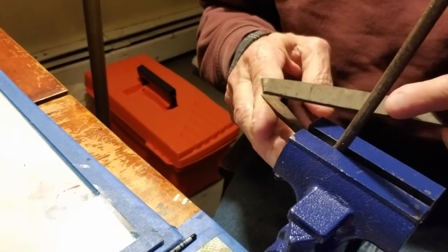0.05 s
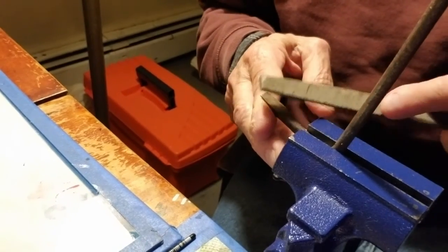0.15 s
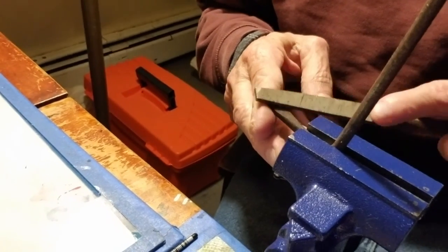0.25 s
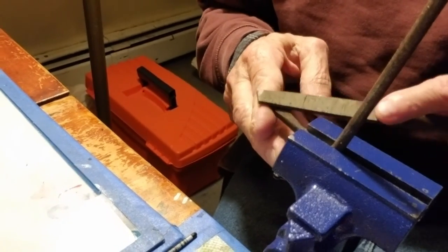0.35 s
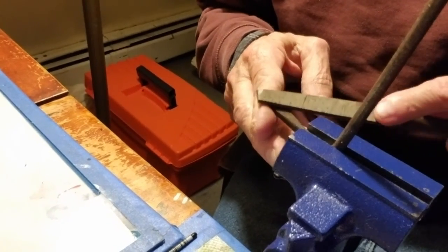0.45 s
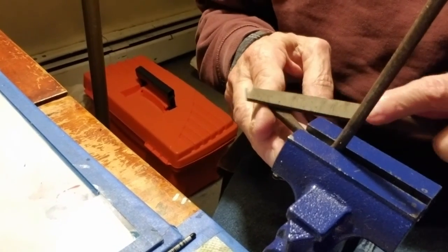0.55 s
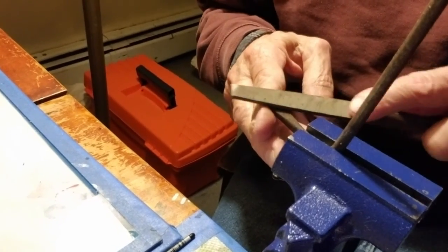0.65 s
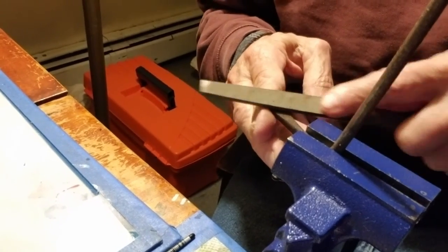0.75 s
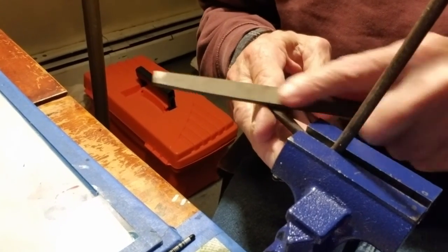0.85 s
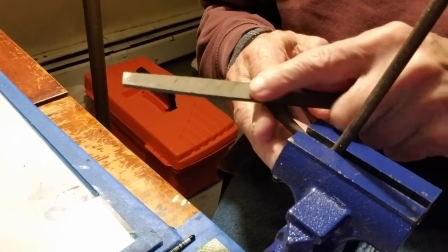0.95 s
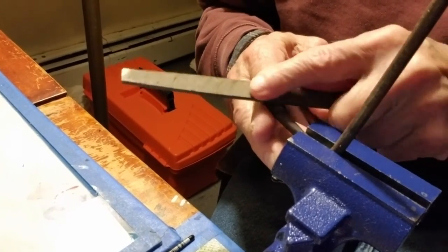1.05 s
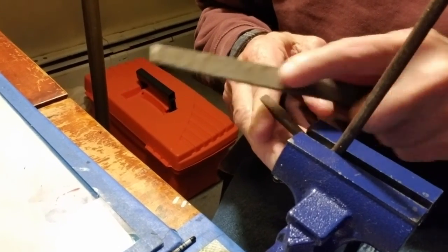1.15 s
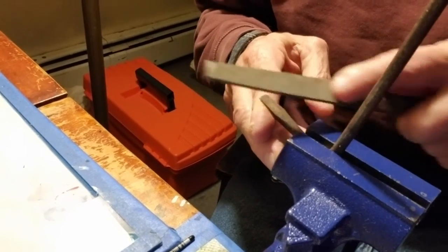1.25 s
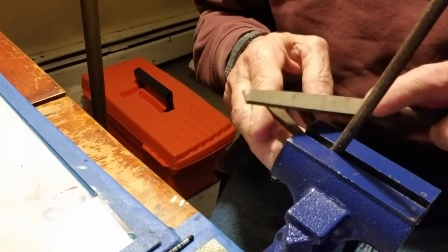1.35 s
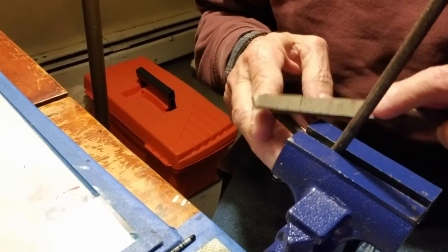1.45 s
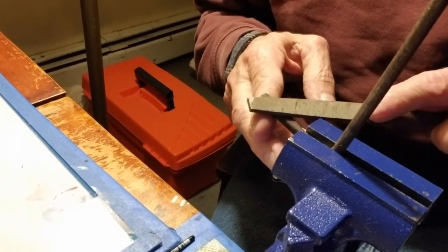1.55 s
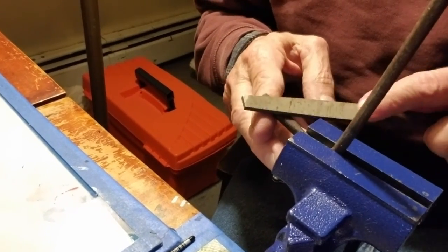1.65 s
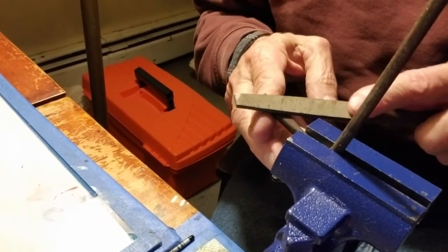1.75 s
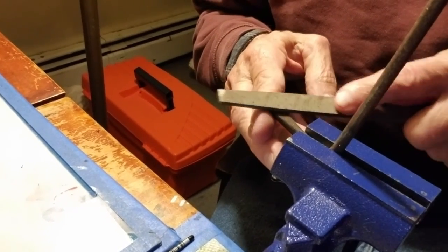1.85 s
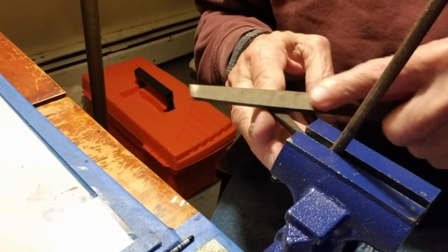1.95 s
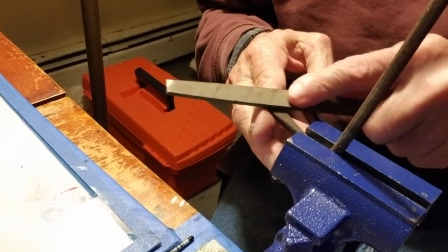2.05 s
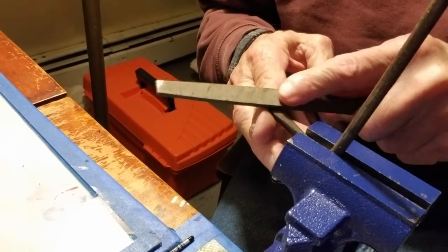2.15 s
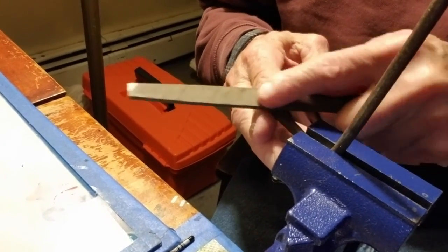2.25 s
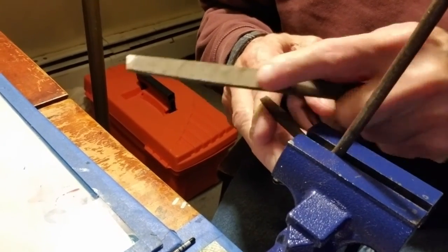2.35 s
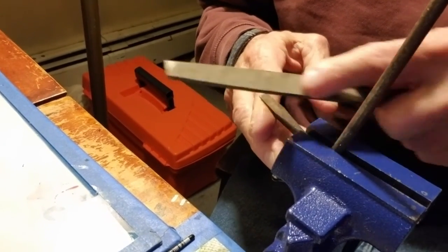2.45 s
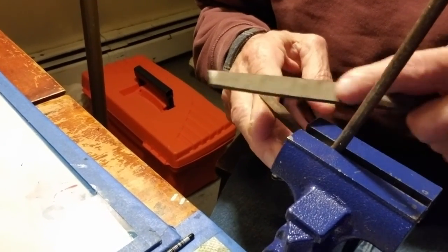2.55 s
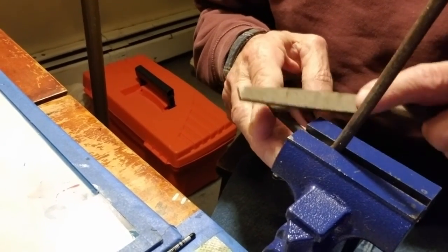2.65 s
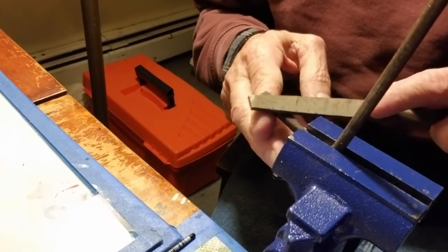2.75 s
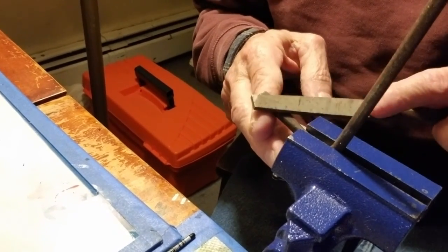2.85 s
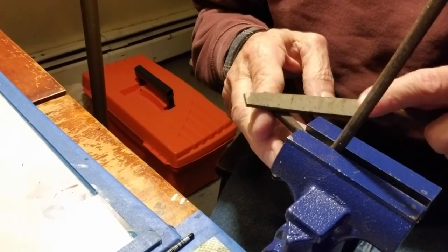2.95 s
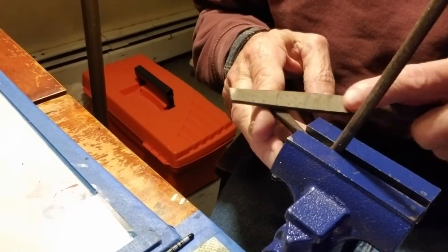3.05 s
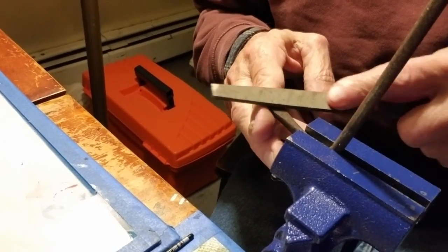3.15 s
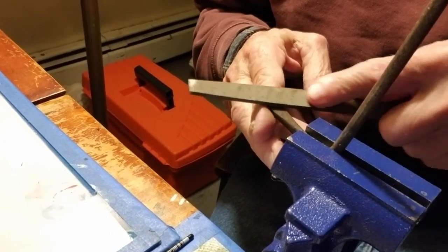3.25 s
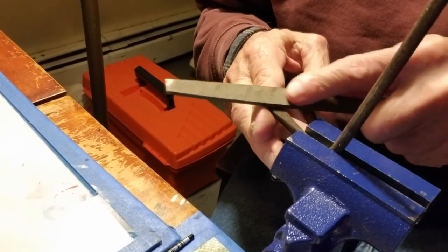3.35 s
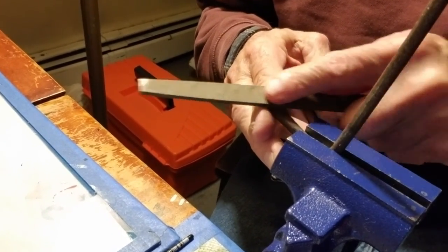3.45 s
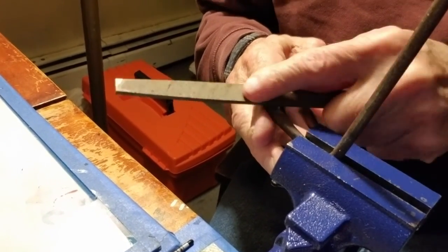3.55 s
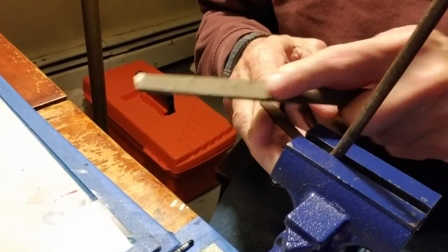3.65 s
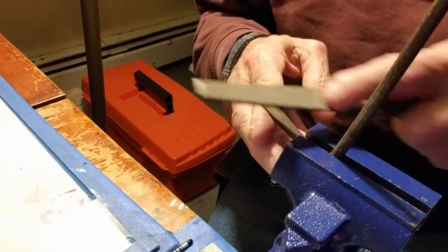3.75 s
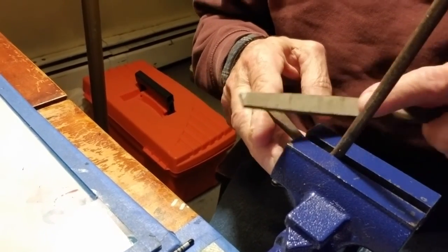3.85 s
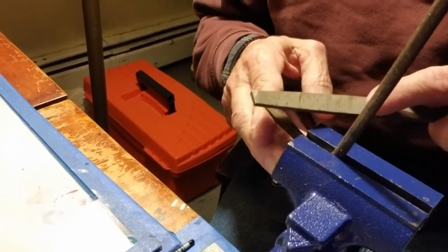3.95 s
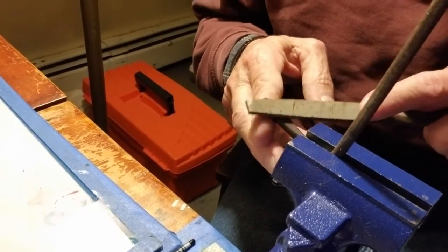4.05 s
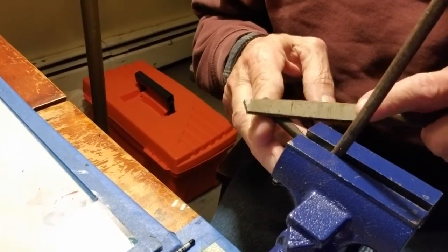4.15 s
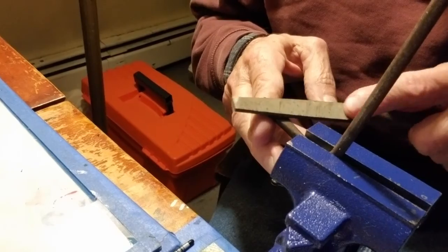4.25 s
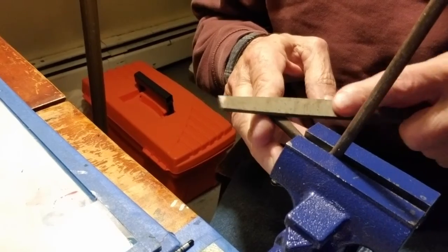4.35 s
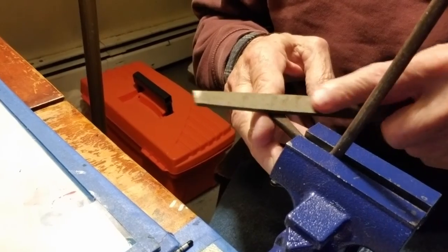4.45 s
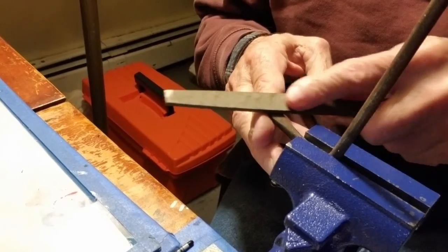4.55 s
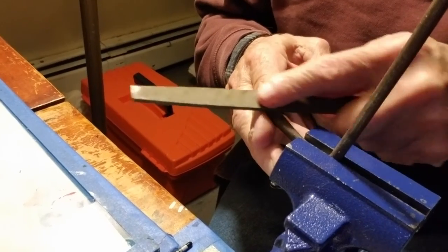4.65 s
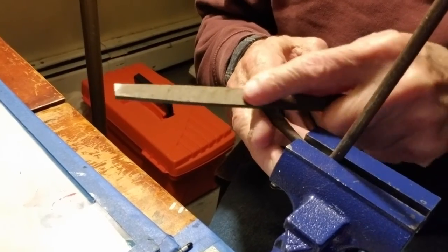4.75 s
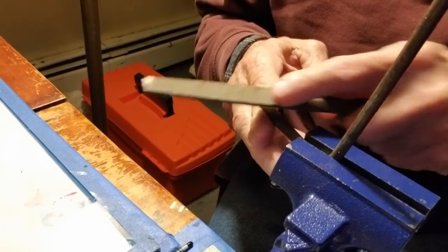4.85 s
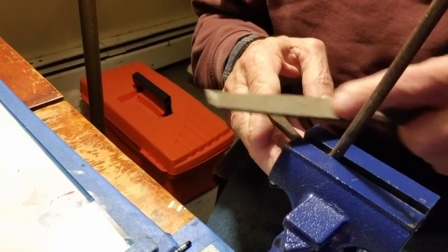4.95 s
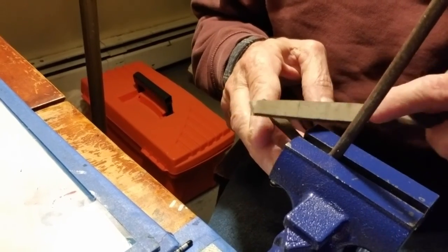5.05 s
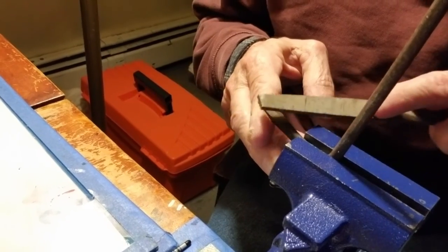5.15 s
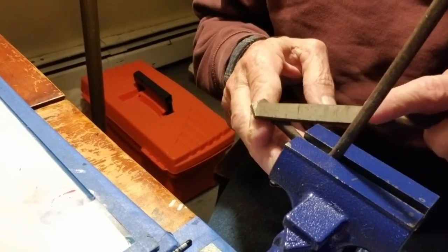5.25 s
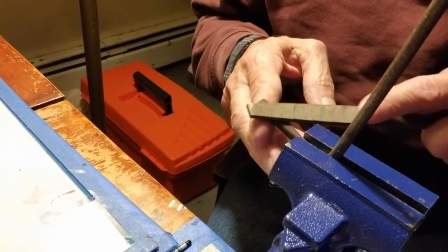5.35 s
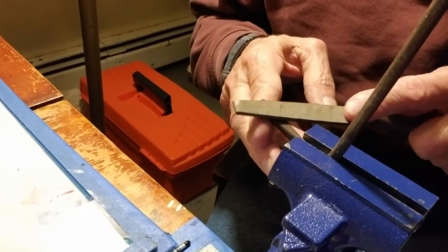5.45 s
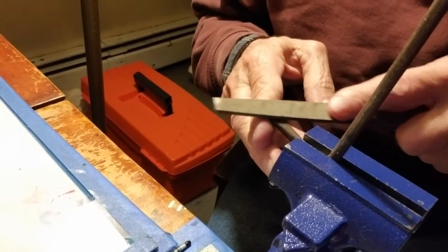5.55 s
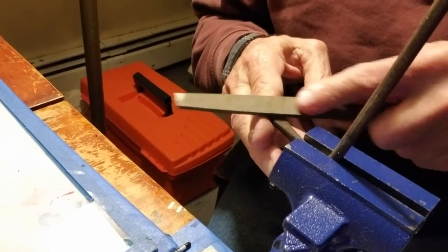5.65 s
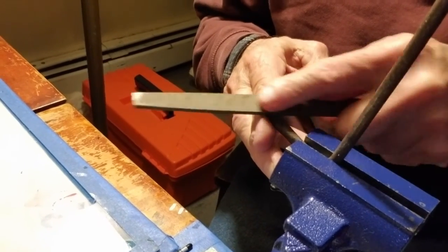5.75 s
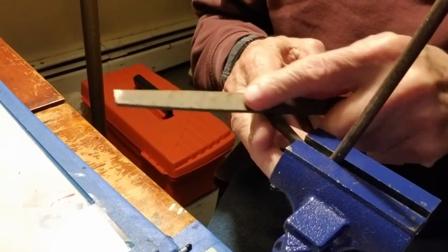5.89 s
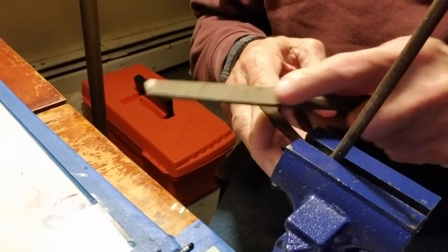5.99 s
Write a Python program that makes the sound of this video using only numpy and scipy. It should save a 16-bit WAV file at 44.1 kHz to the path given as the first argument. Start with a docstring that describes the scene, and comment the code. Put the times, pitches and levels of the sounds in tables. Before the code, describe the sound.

Hand filing of clamped steel, picked up nearby by a phone in stereo with short room reflections. A bright metallic tap opens, then five uneven rasping strokes follow at roughly one-second intervals, dry and scratchy on top with a woody, droning bench underneath. Between them the file rattles against the tip, the vise knocks dully and hands shift softly. A brief faint hum comes before the fourth stroke; low room tone and slight hiss remain throughout.

```python
"""Over a quiet workshop, a hand file is first set down on a steel screwdriver tip held in a vise, and taps.
Five pushing strokes follow: unevenly caught teeth make the bench drone, the shank ring short and the cut hiss.
Around them, touches rattle the file's modes, snags jolt the vise and shifting hands stir the bench.
A soft hum swells between the third and fourth strokes; a last touch follows the fifth.
A phone with two microphone ports stands close by: modes are filtered random catches or decaying sines."""
import sys
import numpy as np
from scipy import signal
from scipy.fft import rfft, irfft, next_fast_len
from scipy.io import wavfile
from scipy.ndimage import uniform_filter1d

SR = 44100
rng = np.random.default_rng(int(sys.argv[2]) if len(sys.argv) > 2 else 0)


def to_wav(sig):
    """Store sig (one row per channel, or 1-D mono) as 16-bit WAV at the path in sys.argv[1].

    Samples outside -1..1 are clipped; the rate is SR.
    """
    pcm = np.clip(np.atleast_2d(sig), -1, 1) * 32767
    pcm = np.round(pcm).astype(np.int16)
    wavfile.write(sys.argv[1], SR, pcm.T)  # frames by channels


N = 265482
T = np.arange(N) / SR
FFT_SIZE = next_fast_len(N + SR)
HZ = np.arange(FFT_SIZE // 2 + 1) * SR / FFT_SIZE

# Spectrum of the quiet workshop. Each row: frequency in Hz, relative density in dB per Hz.
QUIET_SPECTRUM = [(24, -58), (40, -23), (144, -1.5), (469, -20.5), (603, -26.5), (684, -21), (756, -29.5),
                  (1220, -24), (1530, -32.5), (2340, -29), (3970, -35), (5780, -31.5), (8020, -40),
                  (13600, -23.5), (16200, -26.5)]
QUIET_DB = -71  # RMS of the mean of both ports
# Balance of the microphone ports. Each row: frequency in Hz, left minus right in dB.
PORT_BALANCE = [(60, 1.5), (110, 0), (200, -0.5), (380, 1), (700, -3.0), (1290, -3.5), (2380, -4),
                (4400, -5), (8120, -8), (15000, 2.5)]
LEFT_LAG_S = -.0001  # negative: the left port hears the direct sound first
TOP_HZ = 15900

# Decay times by 60 dB, and levels of the reflections
BENCHTOP_T60_S, BENCHTOP_DB = .025, .5
ROOM_T60_S, ROOM_TREBLE_T60_S, ROOM_DB = 0.28, 0.15, -0.5

# The soft hum; it rises and fades by 20 dB in the given times
HUM_FROM_S, HUM_TO_S, HUM_HZ, HUM_DB = 3.875, 3.96, 236, -52.5
HUM_RISE_S, HUM_FADE_S = 0.045, 0.057

# Modes of bench and vise. Each row: frequency in Hz, width in Hz, relative level in dB.
BENCH_MODES = [(51, 37, -18.5), (69.4, 23.3, -3), (92.1, 6.7, -4), (134.2, 19, 4.5), (182.7, 16, 1.5),
               (222.5, 43, -9), (276.5, 20.9, -1), (362, 14.5, -5.5), (438.6, 25, -4.5), (548.6, 66, -17.5)]
# Modes of the screwdriver shank. Each row: frequency in Hz, width in Hz, relative level in dB.
SHANK_MODES = [(686.4, 38, -1.5), (769.6, 23, 0.5), (930, 97, -2), (1074, 90, -9), (1303, 60, -2),
               (1432, 41, -10.5), (1607, 69, -2), (1695, 62, 1), (1974, 58, -7.5), (2267, 74, -16.5),
               (2516, 90, -16.5), (2890, 110, -16)]
# File modes damped by both hands. Each row: frequency in Hz, relative level in dB, 60 dB decay time in s.
FILE_MODES = [(1460, -3.5, 0.03), (1670, -4.5, 0.027), (2188, -1.5, 0.025), (2468, -4, .025),
              (2735, -5.5, 0.027), (2834, -5, 0.064), (4150, -5.5, 0.027), (4927, 3.5, 0.025),
              (5800, -8.5, 0.021), (6520, 2, 0.018), (8400, -14, 0.016), (8915, -8.5, 0.04),
              (10380, -20.5, .018), (11250, -3, .018), (12350, -5, .015), (13090, -17, .018),
              (14400, -6, 0.019), (14600, -5, .015)]

# Hands shift on the bench. Each row: time in seconds, 20 dB fading time in s, level in dB.
# Rows with a negative fading time add nothing audible.
BUMPS = [(.01, 0.3, -61), (0.119, 0.1, -65), (.155, -0.03, -59), (.29, -0.06, -54), (.41, 0.2, -56),
         (1.27, 0.02, -55), (1.37, 1.1, -70), (1.49, -0.6, -70), (1.625, 0.12, -42), (2.58, -0.08, -69),
         (2.79, 0.1, -58.5), (3.76, 0.18, -60.5), (4.0, 0.05, -61), (4.93, 0.3, -58.5), (5.03, -0.08, -54)]
# The file snags and jolts the vise. Each row: start in seconds, level in dB, pitch in Hz,
# knock relative to the tone in dB.
JOLTS = [(0.521, -42, 286, -16), (0.965, -17.5, 129, -15.5), (1.209, -36, 111, 1.5),
         (2.088, -26.5, 195, -11.5), (2.147, -22, 399.5, 4.5), (3.405, -31, 137, -19.5),
         (3.969, -52, 143, -7.5), (4.345, -29.5, 134, -20.5), (5.84, -29, 184, -12.5)]
# The file touches the tip. Each row: start in seconds, level in dB, brightness in dB per octave,
# shank level in dB, grit level in dB, the last two relative to the touch.
TAPS = [(0.2508, -19.5, 0.5, -4.5, 0.5), (0.3831, -59, 6.5, 11, -13), (1.1929, -46, -9, 13, -16),
        (1.533, -49, -15, 13.5, 4), (1.5941, -22, 0, 4.5, 0), (1.7609, -56, 6, -4, 0),
        (2.421, -49, -1, -2, -9), (2.747, -28, -5.5, -7, -5), (4.1248, -44.5, -7.5, 4.5, -7.5),
        (4.2872, -59, 6, -3, 12), (5.2801, -36, -4, 0.5, -2), (5.3558, -40, -3, -21, -5),
        (5.9894, -36, -6, 5, -14)]
# The file settles after a tap: base levels, to which a share of the tap's dB is added
SETTLE_DB, SETTLE_UPPER_DB, SETTLE_SHANK_DB = -50.5, -42.5, -43.5
SETTLE_SHARE, SETTLE_FADE_S = 0.38, .1

# Pressure of the strokes. Each row: full pressure from in seconds, lift in seconds, bench drone in dB
# at first, midway and at lift, shank ring in dB at first and at lift.
STROKES = [(0.622, 1.028, -42.5, -42, -39, -49.5, -50), (1.727, 2.364, -42.5, -35.5, -41.5, -49.5, -50.5),
           (3.029, 3.562, -47.5, -42, -40.5, -55.5, -50), (4.298, 4.767, -38, -39, -40.5, -50, -51),
           (5.461, 5.864, -41, -39.5, -38, -54.5, -49)]
PRESS_DB_PER_S, LIFT_DB_PER_S, SHANK_LIFT_DB_PER_S = 267, 240, 450
UPPER_DB = -.5  # upper bench modes relative to lower, while filing
# Bite of the teeth, one list a stroke. Each row: time in seconds, hiss in dB before smoothing.
BITE = [
    [(.5, -81), (.616, -53.5), (.712, -57.5), (.775, -41.5), (.866, -38), (.895, -43), (1.0, -50.5),
     (1.075, -84)],
    [(1.66, -68), (1.74, -65.5), (1.97, -47), (2.084, -46), (2.134, -60), (2.155, -51), (2.235, -51),
     (2.3, -36), (2.335, -54.5), (2.4, -79)],
    [(2.92, -85), (2.96, -72), (3.12, -53), (3.398, -48.5), (3.436, -56), (3.524, -42.5), (3.57, -50.5),
     (3.6, -47.5), (3.63, -66), (3.72, -91.5)],
    [(4.2, -78.5), (4.304, -54), (4.398, -56), (4.434, -46), (4.554, -48), (4.622, -50), (4.705, -47),
     (4.756, -51), (4.82, -89.5)],
    [(5.38, -71), (5.42, -61), (5.49, -56.5), (5.544, -58.5), (5.62, -47), (5.725, -42.5), (5.85, -48),
     (5.89, -74.5)],
]
# The file brushes the tip outside the push. Each row: time in seconds, 20 dB fading time in s,
# hiss in dB, shank in dB, bench in dB. Rows with a negative fading time add nothing audible.
SCUFFS = [(.395, -0.13, -76, -66, -58), (0.536, 0.03, -84, -67, -45.5), (1.118, 0.0538, -47.5, -51, -46.5),
          (1.21, 0.06, -72.5, -50, -48.5), (2.44, 0.14, -62.5, -71, -74), (5.365, 0.07, -56, -74, -87),
          (5.984, 0.17, -53.5, -52, -51)]
RISE_SHARE = 0.54  # rising time of bumps and scuffs, as a share of the fading time
# Spectrum of the cut. Each row: frequency in Hz, relative density in dB per Hz.
CUT_SPECTRUM = [(1290, -26), (2200, 3), (2640, -13.5), (2940, -7.5), (4490, -8.5), (4880, -9), (6980, -11),
                (7770, -10), (8950, -18), (10400, -12), (14600, -5), (16000, -6.5)]
SHANK_FROM_HISS_DB = -4


def undb(db):
    """Amplitude ratio of a level in decibels."""
    return 10 ** (np.asarray(db) / 20)


def unit(x):
    """Normalisation to an RMS of 1."""
    return x / np.sqrt(np.mean(x ** 2))


def shape(x, gain):
    """Linear filtering: multiply the spectrum by a complex gain."""
    return irfft(rfft(x, FFT_SIZE) * gain, FFT_SIZE)[..., :N]


def colour(points):
    """Spectral envelope in dB, interpolated over log frequency."""
    hz, db = np.transpose(points)
    return np.interp(np.log(HZ + 1), np.log(hz), db)


def resonance(hz, width):
    """Damped resonator: the band-pass of one mode, gain 1 at its centre."""
    s = 1j * HZ * width
    return s / (hz ** 2 - HZ ** 2 + s)


def body(modes):
    """Modal superposition with alternating sign, as neighbouring bending modes radiate."""
    total = 0
    for k, (hz, width, db) in enumerate(modes):
        total = total + (-1) ** k * undb(db) * resonance(hz, width)
    return total


def walk(rate):
    """Slow random fluctuation with an RMS of 1: noise held at the rate, then smoothed twice."""
    k = int(SR / rate)
    steps = np.repeat(rng.standard_normal(N // k + 1), k)
    return unit(uniform_filter1d(uniform_filter1d(steps, k), k)[:N])


def catches(rate, scatter_db):
    """Random impulse train: teeth catch at random moments, most lightly, a few hard."""
    chance = rng.random((N, 2)).T
    caught = chance[0] < rate / SR
    force = undb(-scatter_db * np.log(1 - chance[1]))
    return caught * rng.choice([-1, 1], N) * force


def rung(modes, rate, scatter_db, wander_db, wander_rate):
    """Forced resonance: each mode has its own catches and wanders as the contact moves along the file."""
    total = 0
    for hz, width, db in modes:
        mode = resonance(hz, width) * resonance(hz, 6 * width)
        strength = undb(db + wander_db * walk(wander_rate))
        total = total + strength * shape(catches(rate, scatter_db), mode)
    return unit(total)


def swell(start, end, levels_db, rise, fade):
    """Envelope linear in dB: climb 20 dB per rise time, pass through the levels, fall 20 dB per fade time."""
    times = [start - 4 * rise, *np.linspace(start, end, len(levels_db)), end + 4 * fade]
    levels = [levels_db[0] - 80, *levels_db, levels_db[-1] - 80]
    gain = np.zeros(N)
    on = slice(max(int(times[0] * SR), 0), int(times[-1] * SR))
    gain[on] = undb(np.interp(T[on], times, levels))
    return gain


def brief(s, fade, db):
    """Transient envelope: a short swell without hold."""
    return swell(s, s, [db], RISE_SHARE * fade, fade)


def pressure(full, lift, levels_db, lift_db_per_s):
    """Contact force as an envelope: the hand leans in, holds and lifts."""
    return swell(full, lift, levels_db, 20 / PRESS_DB_PER_S, 20 / lift_db_per_s)


def settling(base_db):
    """Residual excitation: a quick onset and slow fade after every tap."""
    return sum(swell(s, s, [base_db + SETTLE_SHARE * db], .004, SETTLE_FADE_S) for s, db, *_ in TAPS)


def quiet():
    """Stationary noise: room tone below, microphone hiss above; the bass is mostly shared by both ports."""
    mid, side = rng.standard_normal((2, N))
    apart = np.clip(HZ / 900, .3, 1)
    gain = undb(colour(QUIET_SPECTRUM))
    both = shape(mid, gain) + shape(side, gain * apart) * np.array([[1], [-1]])
    return undb(QUIET_DB) * both / np.sqrt(np.mean(both.mean(0) ** 2))


def echoes(t60, start):
    """Exponential reverberant decay: spectrum of scattered reflections at each port, unit energy."""
    t = T[:SR // 2]
    tail = rng.standard_normal((2, len(t))) * (t > start) * 1000 ** (-t / t60)
    return rfft(tail / np.sqrt(np.sum(tail ** 2, axis=1, keepdims=True)), FFT_SIZE)


def room(x):
    """Reverberation off benchtop and tools, then the walls, by convolution with decaying noise."""
    split = 1 / (1 + (HZ / 3000) ** 2)
    scatter = (HZ + 120) / (HZ + 800)
    slow, fast = 2 * np.pi * 1.3 * T, 2 * np.pi * 3.1 * T
    # four sets of paths trade places as hands and file move; their summed power stays constant
    shares = (np.cos(slow) * np.cos(fast), np.cos(slow) * np.sin(fast),
              np.sin(slow) * np.cos(fast + 1), np.sin(slow) * np.sin(fast + 1))
    out = 0
    for share in shares:
        walls = echoes(ROOM_T60_S, .004) * np.sqrt(split)
        walls = walls + echoes(ROOM_TREBLE_T60_S, .004) * np.sqrt(1 - split)
        paths = undb(BENCHTOP_DB) * echoes(BENCHTOP_T60_S, .0003) + undb(ROOM_DB) * walls
        out = out + rfft(x * share, FFT_SIZE) * scatter * paths
    return irfft(out, FFT_SIZE)[:, :N]


def hum():
    """Frequency modulation: a nearly pure tone whose pitch wavers a little."""
    phase = 2 * np.pi * np.cumsum(HUM_HZ * (1 + 0.012 * walk(25.04))) / SR
    gain = swell(HUM_FROM_S, HUM_TO_S, [HUM_DB, HUM_DB], HUM_RISE_S, HUM_FADE_S)
    return np.sqrt(2) * gain * np.sin(phase)


def jolts():
    """Impulse response of the vise: a damped sine with a short band of knocking noise."""
    out = np.zeros(N)
    for s, db, hz, knock_db in JOLTS:
        t = np.clip(T - s, 0, None)
        noise = unit(shape(rng.standard_normal(N), resonance(720, 550) ** 2))
        knock = noise * np.exp(-t / 0.0057)
        tone = np.sin(2 * np.pi * hz * t) * np.exp(-t / 0.021)
        # a heavy, padded blow builds over a few ms
        onset = 1 - np.exp(-t / 0.0042)
        out += undb(db) * onset * (tone + undb(knock_db) * knock)
    return out


def bench():
    """Forced vibration: uneven catches, handling and jolts ring the low modes of vise and bench."""
    filed = sum(pressure(full, lift, db[:3], LIFT_DB_PER_S) for full, lift, *db in STROKES)
    filed = filed + sum(brief(s, fade, db) for s, fade, _, _, db in SCUFFS)
    handled = sum(brief(*row) for row in BUMPS)
    lower_gain = filed + handled + settling(SETTLE_DB)
    upper_gain = undb(UPPER_DB) * filed + undb(-18) * handled + settling(SETTLE_UPPER_DB)
    lower = lower_gain * rung(BENCH_MODES[:5], 400, 2.2, 1.5, 8)
    upper = upper_gain * rung(BENCH_MODES[5:], 500, 2.41, 2.73, 10)
    return lower + upper + jolts()


def taps():
    """Free vibration: each touch rattles the file's modes and the shank, with a gritty crack and tail."""
    out, t = np.zeros(N + SR), T[:SR // 4]
    hz, mode_db, t60 = np.transpose(FILE_MODES)[:, :, None]
    impulse = 1. * (T == 0)
    shank = shape(impulse, body(SHANK_MODES))[:len(t)]
    shank /= 2 * np.abs(shank).max()
    for s, db, bright_db, shank_db, grit_db in TAPS:
        tilt = bright_db * np.log2(hz / 3000) + 1.5 * rng.standard_normal(hz.shape)
        detune = 1 + 0.011 * rng.standard_normal(hz.shape)
        # loose contact makes each mode flutter
        rattle = 1 + 3.6 * uniform_filter1d(rng.standard_normal((len(hz), len(t))), size=70, axis=1)
        tones = np.sin(2 * np.pi * (hz * detune * t + rng.random(hz.shape)))
        modes = undb(mode_db + tilt) * rattle * tones * 1000 ** (-t / t60)
        ring = 0.33 * modes.sum(0) + undb(shank_db) * shank
        # brighter touches have less body in their grit
        white = rng.normal(0, 0.45, len(t) + 1)
        grit = white[1:] - np.clip(0.59 + .08 * bright_db, 0, 1) * white[:-1]
        grit *= np.exp(-t / 0.0012) + .12 * np.exp(-t / 0.04)
        onset = np.clip(t / 0.00072, 0, 1) ** 2
        i = int(s * SR)
        out[i:i + len(t)] += undb(db) * (ring + undb(grit_db) * grit) * onset
    return out[:N]


def cutting():
    """Broadband excitation: dense catches hiss and ring shank and file; the bite wanders along the teeth."""
    push = sum(undb(np.interp(T, *np.transpose(stroke), -120, -120)) for stroke in BITE)
    push = uniform_filter1d(push, size=600)  # contact is made and broken over a few ms
    hiss_gain = push + sum(brief(s, fade, db) for s, fade, db, _, _ in SCUFFS)
    # the shank rings with both pressure and bite
    pressed = sum(pressure(full, lift, db[3:], SHANK_LIFT_DB_PER_S) for full, lift, *db in STROKES)
    ring_gain = np.hypot(pressed, undb(SHANK_FROM_HISS_DB) * push)
    ring_gain += settling(SETTLE_SHANK_DB) + sum(brief(s, fade, db) for s, fade, _, db, _ in SCUFFS)
    bite = undb(1.09 * walk(30))
    hiss = unit(shape(catches(9000, 2.93), undb(colour(CUT_SPECTRUM))))
    # the file's modes are broadened by the pressure of the cut
    pressed_modes = [(hz, 9 / t60, db) for hz, db, t60 in FILE_MODES[6:]]
    steel = rung(pressed_modes, 3000, 3.0, 7.1, 7)
    broad_modes = [(800, 530, -7), (1800, 1200, -19.0)]  # Hz, width in Hz, dB
    ring = rung(SHANK_MODES + broad_modes, 1100, 2.33, 2.4, 9)
    cut = hiss_gain * (hiss + undb(-15.5) * steel)
    shank = ring_gain * undb(1.95 * walk(25)) * ring
    return bite * (cut + shank)


def scene():
    """Superposition: direct sound and reflections reach both ports, over the quiet workshop."""
    near = bench() + hum() + cutting() + taps()
    # the direct sound reaches the left port a little earlier
    lag = np.array([np.exp(-2j * np.pi * HZ * LEFT_LAG_S), np.ones(len(HZ))])
    ports = undb(np.outer([.5, -.5], colour(PORT_BALANCE)))
    return shape(shape(near, lag) + room(near), ports) + quiet()


def record(dry):
    """Low-pass filtering: the phone cuts the top steeply."""
    low_pass = signal.ellip(10, .2, 60, TOP_HZ, fs=SR, output="sos")
    return signal.sosfilt(low_pass, dry)


dry = scene()
out = record(dry)
to_wav(out)
```